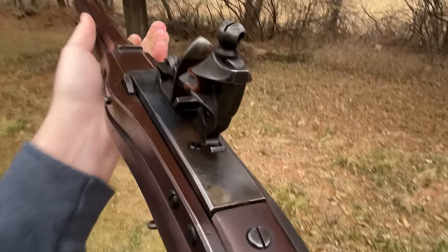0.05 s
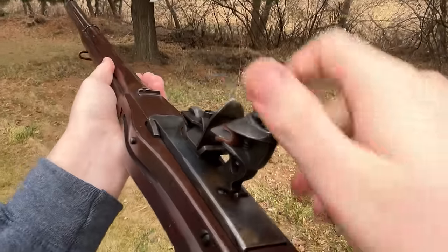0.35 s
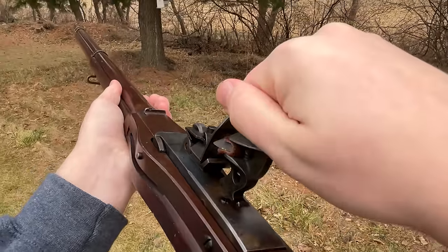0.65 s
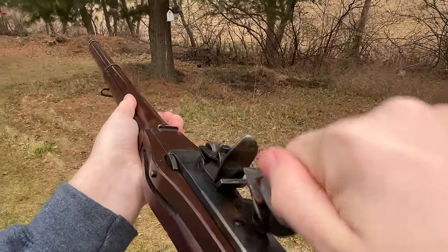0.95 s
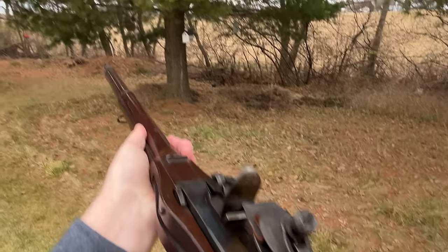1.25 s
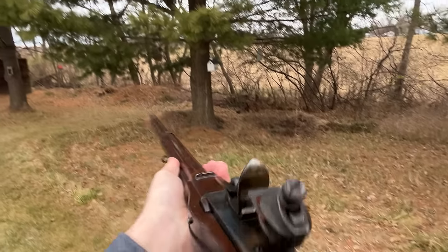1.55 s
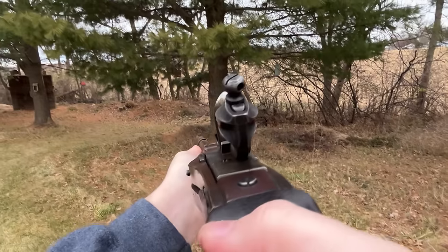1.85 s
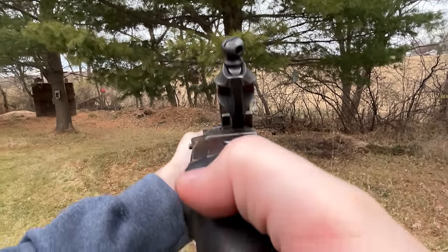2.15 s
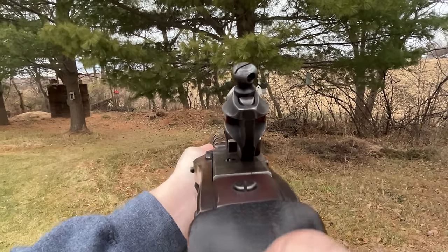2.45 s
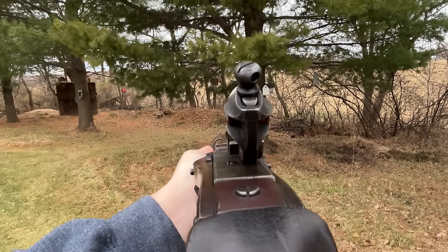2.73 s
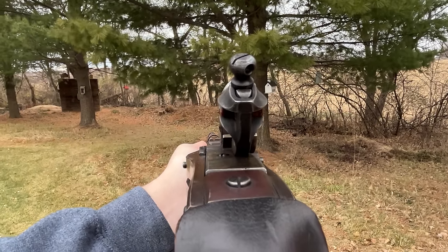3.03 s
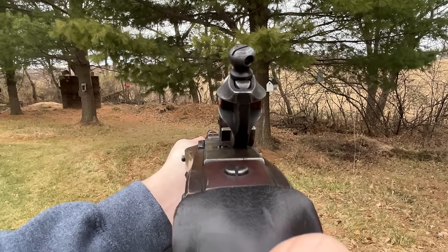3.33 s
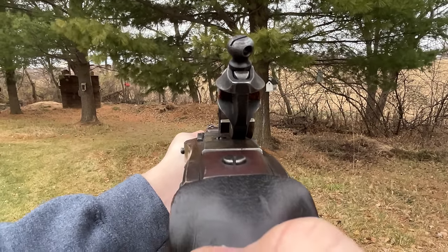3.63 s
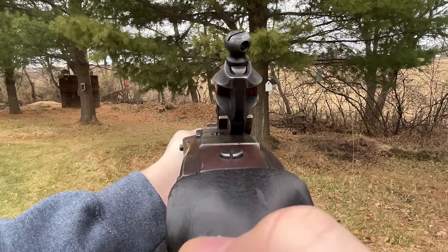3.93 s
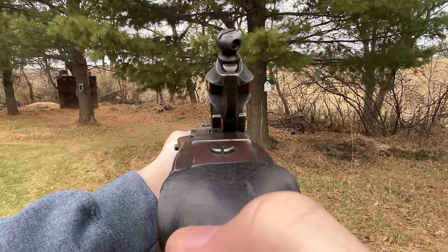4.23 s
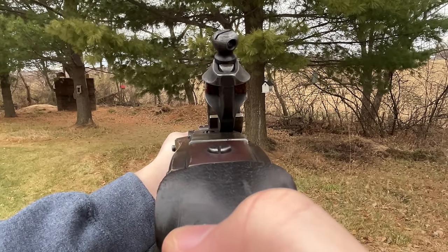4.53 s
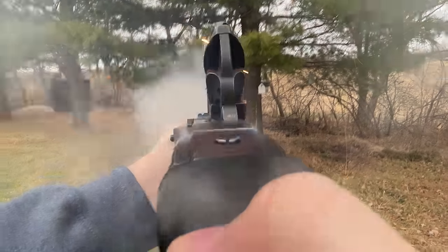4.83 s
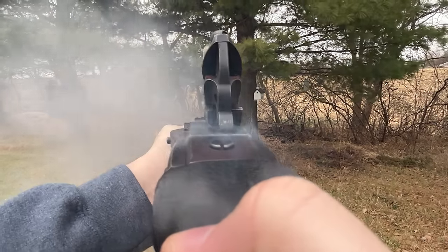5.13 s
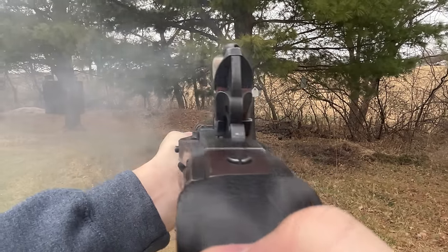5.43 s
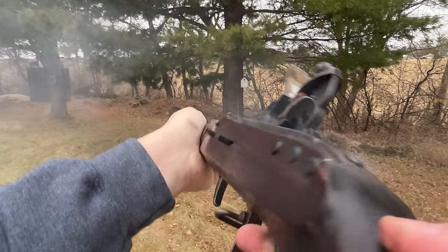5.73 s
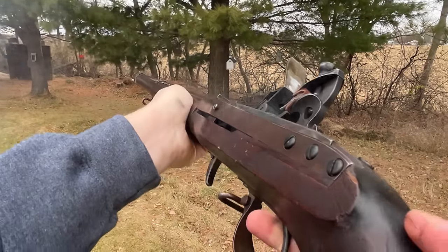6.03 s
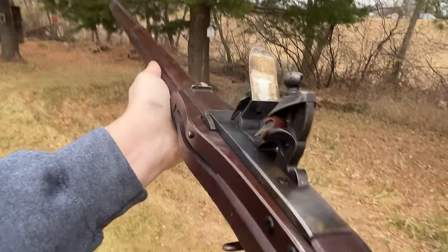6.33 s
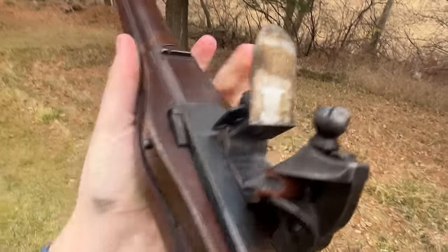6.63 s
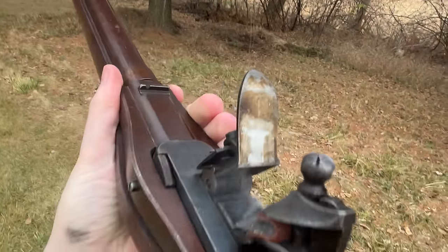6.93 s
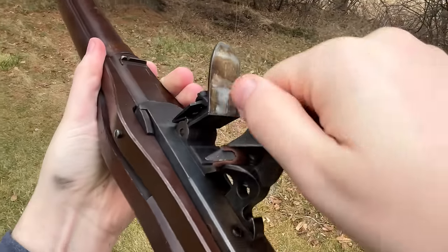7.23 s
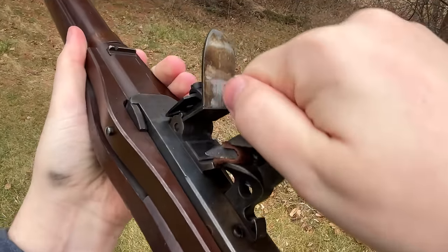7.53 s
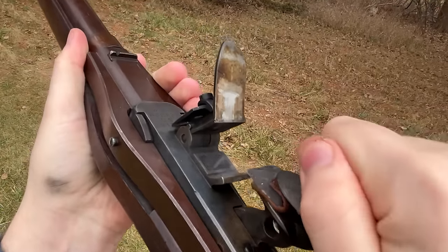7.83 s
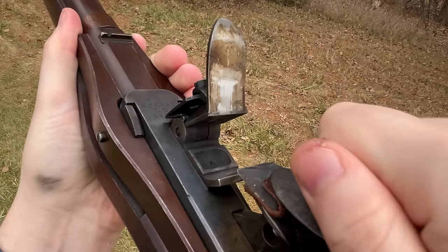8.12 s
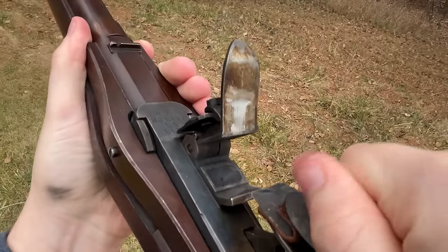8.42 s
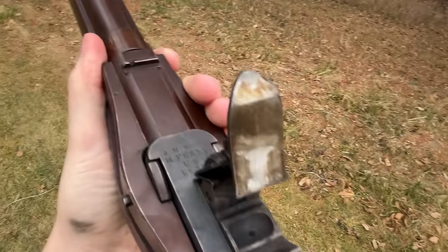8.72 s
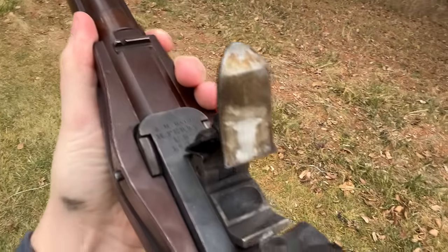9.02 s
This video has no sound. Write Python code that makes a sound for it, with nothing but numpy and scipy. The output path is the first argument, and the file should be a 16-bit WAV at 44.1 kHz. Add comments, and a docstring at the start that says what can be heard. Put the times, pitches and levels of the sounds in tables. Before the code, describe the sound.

Close to the microphone outdoors, a flintlock rifle is cocked with a few sharp metallic clicks. Wind rumbles and thumps on the microphone during a pause. The lock then snaps with a quick rattle, the priming fizzes for an instant, and a loud shot cracks and rolls back from the trees. Afterwards a sleeve brushes faintly on the stock and the hammer is drawn back with one more crisp click.

```python
"""Flintlock shot in the woods

A flintlock is cocked, aimed and fired right beside a small stereo microphone, then drawn to half cock.
The flint scrapes the frizzen, which rattles open; the priming fizzes, and a tenth of a second later the
charge goes off and rolls back from the trees. Wind buffets the microphone, most of all during the aim;
a hand bumps it, and a sleeve brushes the stock over a faint wash of air and hiss."""
import sys
import numpy as np
from scipy import signal
from scipy.fft import rfft, irfft, next_fast_len
from scipy.io import wavfile
from scipy.ndimage import uniform_filter1d

SR = 44100
rng = np.random.default_rng(int(sys.argv[2]) if len(sys.argv) > 2 else 0)


def master(y):
    """Save y as 16-bit WAV."""
    cut = np.clip(np.atleast_2d(y).T, -1, 1)
    pcm = np.round(cut * 32767)  # scale
    wavfile.write(sys.argv[1], SR, pcm.astype(np.int16))


N = 408807
T = np.arange(N) / SR

# Tone of each noise layer. Each row: frequency in Hz, relative level in dB.
AIR_TONE = [(200, 13.5), (700, 3.5), (1700, -1.5), (3000, -11.5), (7000, -19), (11000, -20.5),
            (16000, -26.5)]
HISS_TONE = [(2500, -14), (4000, -5), (4700, -1), (5300, -2.5), (5850, 7), (6400, -11.5), (7200, -29),
             (16000, -27)]
WIND_TONE = [(20, -28.5), (45, -3.5), (68, 0), (160, -9.5), (330, -16.5), (520, -24.5), (1200, -66),
             (4000, -100)]
FLASH_TONE = [(200, -9), (500, 7), (1000, -5.5), (10000, -13.5), (16000, -29.5)]
CRACK_TONE = [(200, -4.5), (550, -2), (1000, -15), (1800, -1), (2700, -17.5), (4800, -4.5), (10000, -11.5),
              (12000, -29.5), (16000, -32.5)]
ECHO_TONE = [(130, -9), (950, -8.5), (1620, -4.5), (2900, -14), (4700, -12.5), (7000, -30), (16000, -50)]
# Strength of the wind. Each row: time in seconds, relative level in dB.
WIND_CURVE = [(0.0, -51), (0.77, -55), (1.1, -49), (1.85, -50), (2.17, -32), (2.68, -37.5), (4.03, -39.5),
              (4.39, -55), (5.13, -45), (5.55, -51), (6.4, -54.5), (6.9, -63), (7.6, -61), (7.85, -46.5),
              (8.6, -54), (9.27, -47.5)]
# Wind puffs and hand bumps on the microphone. Each row: start in seconds, level in dB, length in seconds.
MIC_THUDS = [(0.082, -43, 0.16), (1, -33.5, 0.0029), (1.037, -38, 0.0092), (1.487, -40.5, 0.041),
             (2.256, -32.5, 0.027), (2.286, -25.5, 0.012), (2.492, -26.5, 0.017), (2.514, -25, .011),
             (2.568, -26.5, 0.009), (2.685, -31, 0.028), (2.74, -26, 0.016), (2.77, -30, 0.021),
             (3.041, -22.5, 0.036), (3.083, -23.5, 0.016), (3.216, -35.5, 0.014), (3.279, -33, 0.013),
             (3.376, -27.5, 0.011), (3.439, -33.5, 0.022), (3.695, -31, 0.012), (3.736, -34.5, 0.045),
             (3.781, -27, 0.013), (3.805, -25, 0.036), (4.011, -26.5, 0.029), (4.073, -29.5, 0.015),
             (4.093, -24, 0.014), (5.524, -33.5, 0.0041), (5.789, -36, .012), (5.902, -37, 0.024),
             (6.432, -43.5, 0.02), (7.131, -46.5, 0.034), (8.141, -36.5, 0.015), (8.227, -38, 0.016),
             (8.349, -36.5, 0.032)]
# Touches on the stock. Each row: middle in seconds, level in dB, half-length in seconds, centre in Hz.
TOUCHES = [(0.207, -57.5, 0.035, 8000), (1.297, -68, 0.19, 9300), (1.585, -60, 0.23, 4600),
           (1.983, -46, 0.003, 4600), (1.999, -56, 0.062, 4630), (2.416, -67.5, 0.21, 9300),
           (4.097, -38, .0015, 1300), (5.504, -56, 0.0018, 6030), (6.673, -58, 0.004, 6930),
           (7.51, -55, 0.0015, 2600), (7.924, -55, .05, 1510), (8.77, -58, 0.16, 1740),
           (9.053, -50.5, 0.33, 342), (9.099, -40, .005, 650)]
# Blows of cock, sear and frizzen. Each row: time in seconds, relative level in dB, corner in Hz,
# tilt in dB per octave, decay in ms, pitch of the struck part in Hz, its resonance in dB.
LOCK_BLOWS = [(0.8209, -18.5, 4200, -7, 2.2, 1400, 0.5), (0.967, -3, 6300, 0, 1.13, 4640, 2),
              (0.974, -22, 2300, -3.5, 3.7, 865, 7), (1.0815, -15, 5800, 1, 1.3, 3320, 11.5),
              (1.1230, -21.5, 1500, -6.5, 2.3, 1370, -7), (4.6578, -5, 7500, -1, 0.92, 5550, 9),
              (4.6707, -1.5, 9970, -1.5, .75, 6340, 4.5), (4.682, 1, 8500, -6.5, 0.94, 1866, 5.5),
              (4.686, -9.5, 2800, -1.5, 1.3, 2235, 2.5), (4.697, -8.5, 9500, -4.5, 1, 6415, -6),
              (4.7088, -15.5, 8500, -3, .8, 6300, -1), (7.0458, -35, 4760, 3.5, 0.89, 5270, 18.5),
              (7.777, -33.5, 5000, -5.5, 3.4, 1285, -13.5), (7.7987, -0.5, 12000, 1, 0.93, 8390, 2.5),
              (7.886, -29, 4500, -9, 1.3, 1310, 4)]
# Ring of the lock plate and springs. Each row: pitch in Hz, resonance in dB, t60 in seconds.
PLATE_MODES = [(1364, 7, 0.028), (1890, 4.5, .028), (2500, 4.5, 0.034), (3950, -2.5, 0.016),
               (4570, 1.5, 0.027), (5200, -2.5, 0.047), (6160, -6, 0.023), (8040, -8, .008),
               (9200, 0, 0.0063)]
# Knocks in the wooden stock. Each row: start in seconds, level in dB.
STOCK_KNOCKS = [(0.823, -39), (0.971, -36), (7.777, -36.5), (7.801, -31.5)]
# The flint scrapes, then the vent jets around the report. Each row: peak in seconds, level in dB.
SCRAPE_AND_JETS = [(4.656, -28.5), (4.764, -29), (4.79, -38.5)]
# Blasts of air from pan and muzzle. Each row: start in seconds, level in dB, first and last pitch
# in Hz, decay in seconds.
AIR_BLASTS = [(4.6702, -13.5, 398, 67, 0.022), (4.68, -14.5, 105, 57.4, 0.033),
              (4.768, -13.5, 440, 246, 0.011), (4.784, -13, 294.3, 58.4, .019)]
# The report. Each row: start in seconds, relative level in dB, length in ms, left over right in dB.
MUZZLE_CRACK = [(4.7705, -5.5, 5.8, -1)]
# Echoes off the ground, then trunks. Each row: start in seconds, relative level in dB, rise in ms,
# left over right in dB.
SINGLE_ECHOES = [(4.7775, -14.5, 1.8, 2), (4.822, -9, 2.2, 2.5), (4.866, -15, 1.1, 6), (5.029, -17, 1.8, 8),
                 (5.183, -23, 1.8, 0), (5.1945, -15, 2.3, 4.5)]
# Likeness of the noise at the two microphone ports. Each row: frequency in Hz, correlation.
PORT_LIKENESS = [(60, 0.44), (250, 0.65), (700, 0.092), (6000, 0.089), (7500, 0.94)]
# Brightness of the right port. Each row: frequency in Hz, level over the left port in dB.
PORT_TILT = [(200, 0.5), (500, 4), (1000, 0), (2200, 0.5), (4000, 8), (5500, 14.5), (6400, 7.5),
             (7300, -0.5)]

SHOT_S = MUZZLE_CRACK[0][0]
SINCE_SHOT = T - SHOT_S
LEAD_S = 0.005  # room for a blow to build before its peak
TOP_HZ = 16200


def amp(db):
    """Decibels to gain."""
    return 10 ** (np.asarray(db) / 20)


def unit(x):
    """Scales to rms 1."""
    return x / np.sqrt(np.mean(x ** 2) + 1e-20)


def read(points, hz):
    """Reads a table on a log-frequency axis."""
    f, value = np.transpose(points)
    return np.interp(np.log(hz + 1), np.log(f + 1), value)


def add(mix, s, sound):
    """Mixes a sound in at s seconds."""
    part = mix[:, max(round(s * SR), 0):][:, :sound.shape[1]]
    part += sound[:, :part.shape[1]]


def noise(tone, size=N):
    """Stereo noise of rms 1 with the given tone, partly alike at the two ports."""
    n = next_fast_len(size)
    hz = np.fft.rfftfreq(n, 1 / SR)
    left, other = np.exp(2j * np.pi * rng.random((2, len(hz))))
    alike = read(PORT_LIKENESS, hz)
    right = alike * left + np.sqrt(1 - alike ** 2) * other
    return unit(irfft(np.array([left, right]) * amp(read(tone, hz)), n)[:, :size])


def flutter(hz, depth_db):
    """A random gain that wanders about hz times a second."""
    knots = np.arange(0, T[-1] + 1, 1 / hz)
    return amp(depth_db * np.interp(T, knots, rng.standard_normal(len(knots))))


def band(x, lo_hz, hi_hz):
    """Band-pass."""
    return signal.sosfilt(signal.butter(3, [lo_hz, hi_hz], "band", fs=SR, output="sos"), x)


def swell(peak_s, db, rise, fall):
    """A gain that climbs to its peak and dies away; slopes in dB per second."""
    return amp(db - np.maximum(rise * (peak_s - T), fall * (T - peak_s)))


def background(air_db=-54, hiss_db=-61.5, dip_db=-10.5, hold_s=2.96, recover_db_per_s=9.5):
    """A faint outdoor wash and right-leaning microphone hiss; both duck at the shot and creep back."""
    recovered_db = recover_db_per_s * np.maximum(SINCE_SHOT - hold_s, 0)
    duck_db = np.minimum(dip_db + recovered_db, 0) * (SINCE_SHOT > 0)
    wash = amp(air_db + 0.4 * duck_db) * noise(AIR_TONE)
    hiss = amp(hiss_db + duck_db) * noise(HISS_TONE) * amp([[-5], [0]])
    return wash + hiss


def wind(rumble_hz=170, rush_limit_db=-44, cross_s=0.00045):
    """Lumpy rumble with a soft rush above it, reaching the right port first."""
    flow = noise(WIND_TONE)
    strength = amp(1.5 + np.interp(T, *np.transpose(WIND_CURVE))) * flutter(hz=26.35, depth_db=5.5)
    rumble = signal.sosfiltfilt(signal.butter(2, rumble_hz, fs=SR, output="sos"), flow)
    left, right = rumble * strength + (flow - rumble) * np.minimum(strength, amp(rush_limit_db))
    return np.array([np.interp(T - cross_s, T, left), right])


def mic_thuds(tilt_db_per_octave=-3.5, cross_s=0.00045, tail_db=-7, tail_s=0.062, size=16384):
    """Puffs of wind and bumps of the hand thud on the microphone, right port first, with a low tail."""
    out, t = np.zeros((2, N)), np.arange(size) / SR
    hz = np.fft.rfftfreq(size, 1 / SR) + 1
    lag_cycles = 1.11 * np.log(hz + 20) + hz * np.array([[cross_s], [0]])  # the lows arrive late
    for s, db, length_s in MIC_THUDS:
        jostle = rng.standard_normal(size) + 0.44 * rng.standard_normal((2, size))
        progress = 2.2 * t / length_s
        push = rfft(jostle * (progress * np.exp(1 - progress)) ** 1.36)
        low_hz = 50 + 0.21 / length_s
        high_hz = 564 * 2 ** ((db + 27.5) / 12.5)  # a stronger thud reaches higher
        tone = amp(tilt_db_per_octave * np.log2(hz))
        tone /= np.hypot(1, (low_hz / hz) ** 3) * np.hypot(1, (hz / high_hz) ** 4)
        thud = unit(irfft(push * tone * np.exp(-2j * np.pi * lag_cycles)))
        thud *= np.sqrt((length_s + 0.0071) / t[-1])
        fade = np.exp(-np.maximum(t - length_s, 0) / min(tail_s, 2 * length_s))
        tail = noise(WIND_TONE, size) * np.minimum(t / length_s, 1) * fade
        add(out, s, amp(db) * (thud + amp(tail_db) * tail))
    return out


def handling():
    """Sleeve and fingers brush the stock with a grainy rustle; the shortest touches are taps."""
    out = np.zeros((2, N))
    grain = unit(flutter(hz=180.3, depth_db=3))
    for s, db, half_s, hz in TOUCHES:
        t = np.arange(-2 * half_s, 2 * half_s, 1 / SR)
        tone = [(hz / 5, -18), (hz / 2, -4), (hz, 0), (2 * hz, -16), (16 * hz, -80)]
        cloth = noise(tone, size=2 * SR)[:, :len(t)]
        add(out, s + t[0], amp(db) * cloth * np.exp(-2 * (t / half_s) ** 2))
    return out * grain


def mode(t, hz, db, t60):
    """A dying ring whose gain at its own pitch is db."""
    fade = amp(-60 * t / t60)
    return amp(db) * 2 * fade / fade.sum() * np.cos(2 * np.pi * hz * t)


def tick(tone, force):
    """A burst of tiny impacts under a force curve, evened out to the given tone."""
    spectrum = rfft(noise([(0, 0), (SR, 0)], len(force)) * force)
    spectrum /= np.sqrt(uniform_filter1d(abs(spectrum) ** 2, size=90, axis=1) + 1e-12)
    spectrum *= amp(read(tone, np.fft.rfftfreq(len(force), 1 / SR)))
    return unit(irfft(spectrum)) * np.sqrt(np.mean(force ** 2))


def blow(corner_hz, tilt_db, decay_ms, part_hz, part_db, rise_ms=0.18, rebound_s=0.00108, size=8192):
    """Steel strikes and rebounds once; the burst rings the lock plate and dies, duller, in the stock."""
    t = np.arange(size) / SR
    # spring tension and grip shift the modes from blow to blow
    ring = sum(mode(t, hz * rng.normal(1, .004), db, t60) for hz, db, t60 in PLATE_MODES)
    ring += mode(t, part_hz, part_db, t60=0.011)
    hz = np.geomspace(50, SR / 2, 40)
    octaves = np.log2(hz / corner_hz)
    bass_cut_db = 6 * np.maximum(np.log2(1310 / hz), 0)
    tone_db = tilt_db * octaves - 17.5 * np.maximum(octaves, 0) - bass_cut_db
    ms = 1000 * (t - LEAD_S)
    force = np.exp(np.minimum(ms / rise_ms, -ms / decay_ms))
    stock = noise(np.c_[hz, tone_db - 9 * octaves], size) * (ms > 0) * np.exp(-t / 0.022)
    strike = tick(np.c_[hz, tone_db], force) * (t < t[-1] / 2)
    # the light second contact holds only treble
    rebound = signal.sosfiltfilt(signal.butter(2, 3200, "high", fs=SR, output="sos"), strike)
    burst = strike + amp(-4) * np.roll(rebound, round(rebound_s * SR), axis=1) + amp(-32) * stock
    steel = burst + signal.fftconvolve(burst, ring[None], axes=1)[:, :size]
    return steel * np.linalg.norm(force) / np.linalg.norm(steel[0])


def lock(trim_db=-4, stock_hz=523.5, stock_t60=0.082):
    """The cock clicks back and falls, the frizzen rattles open; cocking also knocks in the stock."""
    out, t = np.zeros((2, N)), np.arange(SR // 4) / SR
    for s, db, *contact in LOCK_BLOWS:
        add(out, s - LEAD_S, amp(db + trim_db) * blow(*contact))
    for s, db in STOCK_KNOCKS:
        add(out, s, amp(db - 60 * t / stock_t60) * np.sin(2 * np.pi * stock_hz * t)[None])
    return out


def ignition(start_s=4.652, end_s=4.77, burn_db=-49):
    """The flint scrapes down the frizzen, then the priming fizzes; the vent jets around the report."""
    burn = amp(burn_db) * (T > start_s) * (T < end_s)
    swells = sum(swell(s, db, rise=1597, fall=698.5) for s, db in SCRAPE_AND_JETS)
    return noise(FLASH_TONE) * np.hypot(burn, swells)


def thumps(glide_s=0.01, attack_s=0.0016, roughness=0.4, size=8192):
    """A turbulent push of air swings each diaphragm, fast at first and then slower."""
    out, t = np.zeros((2, N)), np.arange(size) / SR
    for s, db, first_hz, last_hz, decay_s in AIR_BLASTS:
        eddies = roughness * unit(band(rng.standard_normal((2, size)), 80, 963))
        hz = (last_hz + (first_hz - last_hz) * np.exp(-t / glide_s)) * (1 + eddies)
        fade = np.exp(-t / decay_s)
        swing = np.sin(2 * np.pi * np.cumsum(hz, axis=1) / SR) + eddies * fade
        add(out, s, amp(db) * swing * (1 - np.exp(-t / attack_s)) * fade)
    return out


def shot(trim_db=-9, attack_ms=0.28, decay_ms=0.9, loss_db_per_hz_s=0.0098, size=4096):
    """The charge cracks; the ground and near trunks slap it back, duller the longer the path."""
    out, ms = np.zeros((2, N)), 1000 * np.arange(size) / SR
    sides = np.array([[0.5], [-0.5]])
    for s, db, length_ms, pan_db in MUZZLE_CRACK:
        blast = np.minimum(ms / attack_ms, 1) * np.exp(-np.maximum(ms - length_ms, 0) / decay_ms)
        add(out, s, amp(db + trim_db + pan_db * sides) * noise(CRACK_TONE, size) * blast)
    for s, db, rise_ms, pan_db in SINGLE_ECHOES:
        slap = ms / rise_ms * np.exp(1 - ms / rise_ms)
        dulled = [(hz, tone_db - loss_db_per_hz_s * hz * (s - SHOT_S)) for hz, tone_db in ECHO_TONE]
        add(out, s, amp(db + trim_db + pan_db * sides) * noise(dulled, size) * slap)
    return out


def woods(tree_line_s=0.43):
    """Countless small echoes merge into a grainy roll that swells again when the tree line answers."""
    def fading(db, db_per_s):
        return amp(db - db_per_s * abs(SINCE_SHOT))

    scatter = noise(ECHO_TONE) * flutter(hz=269.6, depth_db=2) * flutter(hz=54.7, depth_db=1)
    answer_s = SHOT_S + tree_line_s
    near, far = fading(-46, 34.5), fading(-47.5, 15.5)
    low_answer = swell(answer_s, -36, rise=12.5, fall=65)
    high_answer = swell(answer_s - 0.073, -40.5, rise=68.5, fall=78)
    body = unit(band(scatter, 90, 2876)) * np.sqrt(near ** 2 + far ** 2 + low_answer ** 2)
    crackle = unit(band(scatter, 3700, 6500)) * np.hypot(fading(-36.5, 63), high_answer)
    fizz = unit(band(scatter, 8300, TOP_HZ)) * fading(-42, 84)  # distance takes the treble first
    return (body + crackle + fizz) * np.interp(SINCE_SHOT, [.006, .014, 1.1, 1.8], [0, 1, 1, 0])


def scene():
    """Rifle, woods and weather."""
    rifle = lock() + ignition() + shot()
    return rifle + woods() + thumps() + wind() + mic_thuds() + handling() + background()


def record(dry, port_hz=12600, port_width_hz=1700):
    """The right port is brighter; near resonance the ports swing against each other; peaks soft-clip."""
    hz = np.fft.rfftfreq(N, 1 / SR)
    tilt_db = read(PORT_TILT, hz)
    lag = np.exp(-1j * np.pi * np.exp(-((hz - port_hz) / port_width_hz) ** 2))
    ports = irfft(rfft(dry) * np.array([amp(-tilt_db / 2) * lag, amp(tilt_db / 2)]), N)
    low_pass = signal.firwin(511, TOP_HZ, window=("kaiser", 9), fs=SR)
    return signal.oaconvolve(np.tanh(ports), low_pass[None], "same")


dry = scene()
out = record(dry)
master(out)
```